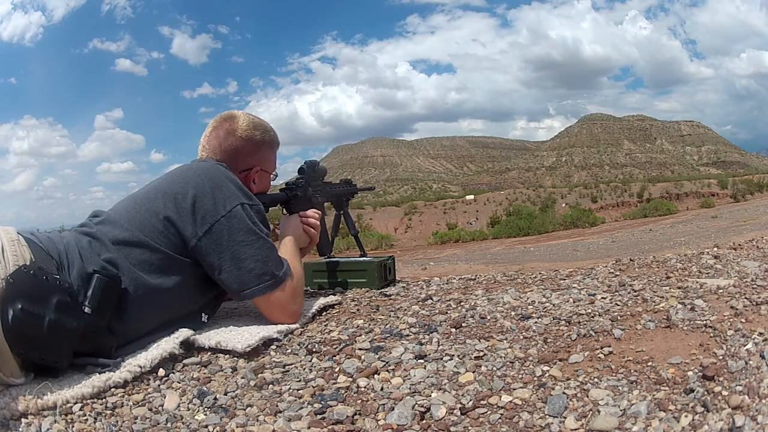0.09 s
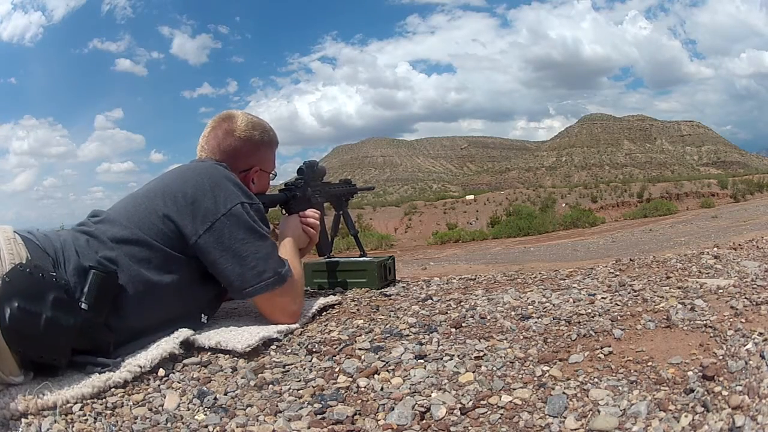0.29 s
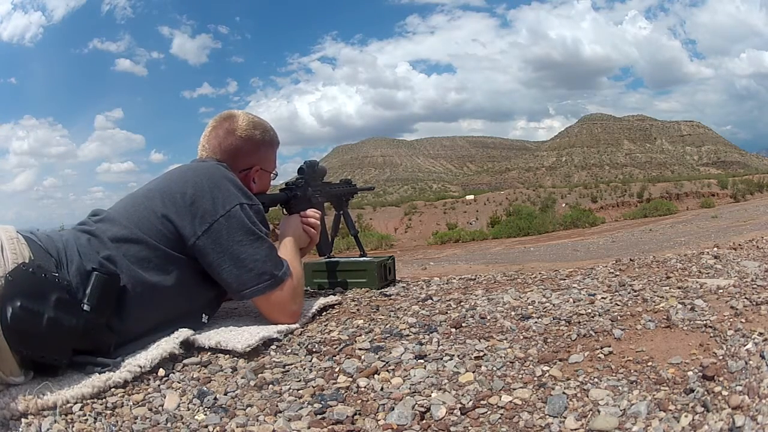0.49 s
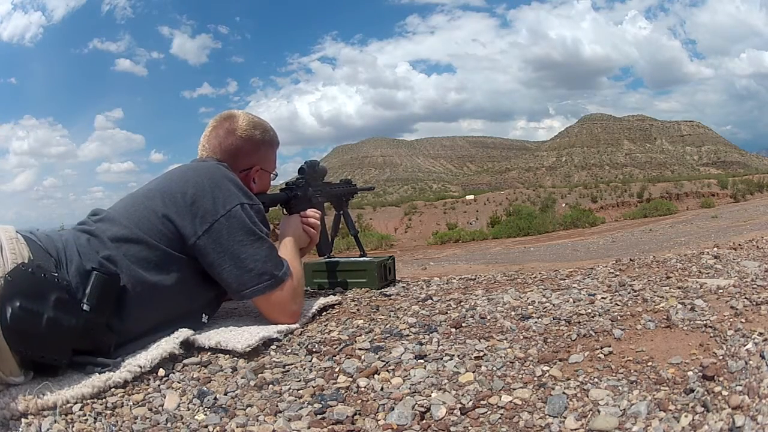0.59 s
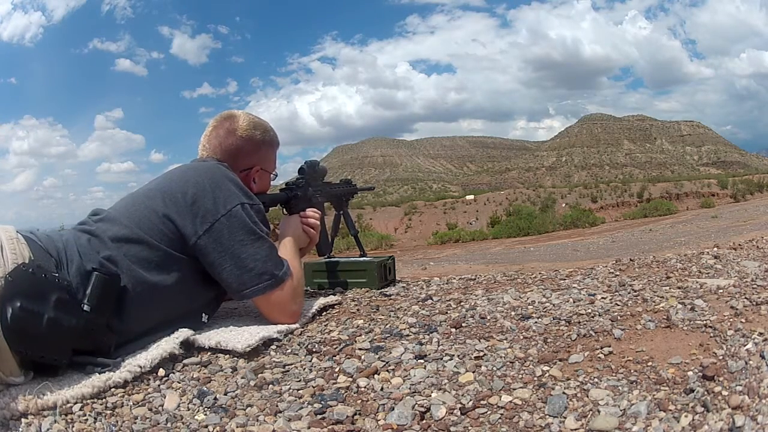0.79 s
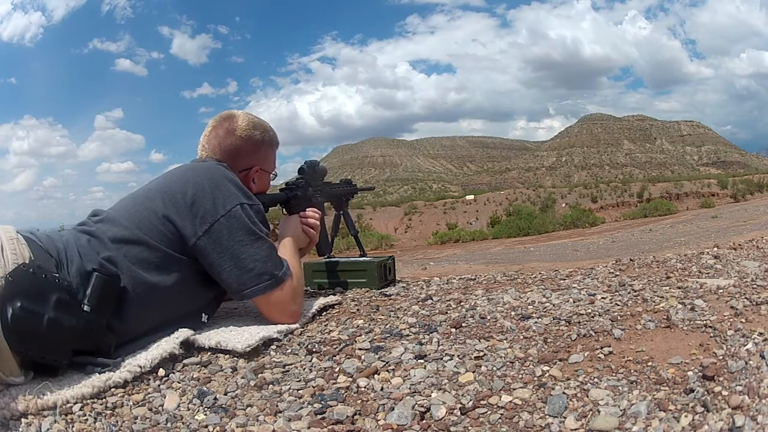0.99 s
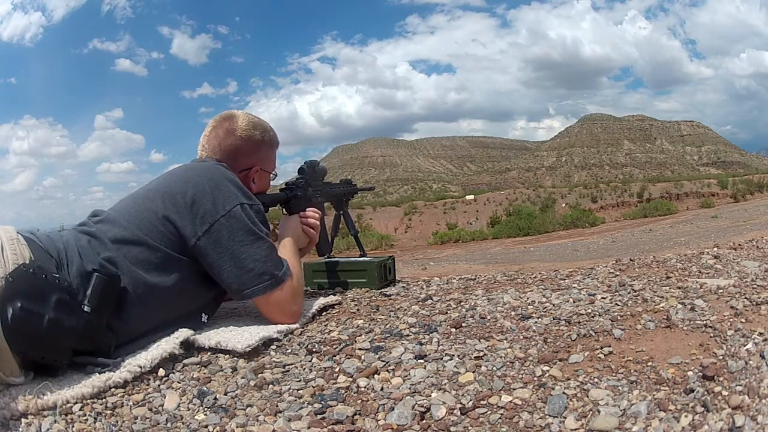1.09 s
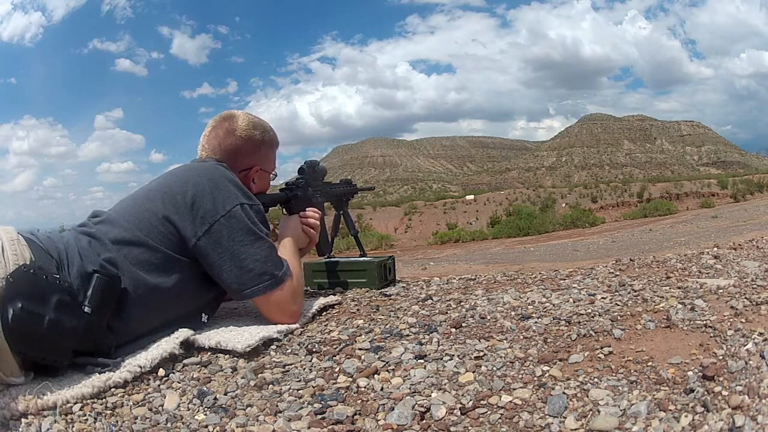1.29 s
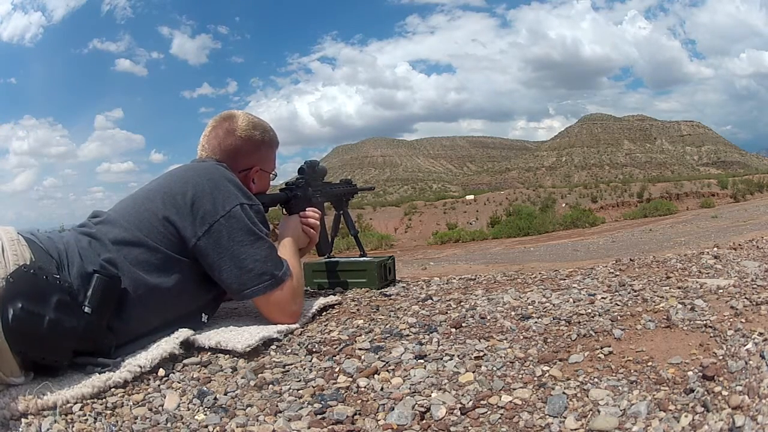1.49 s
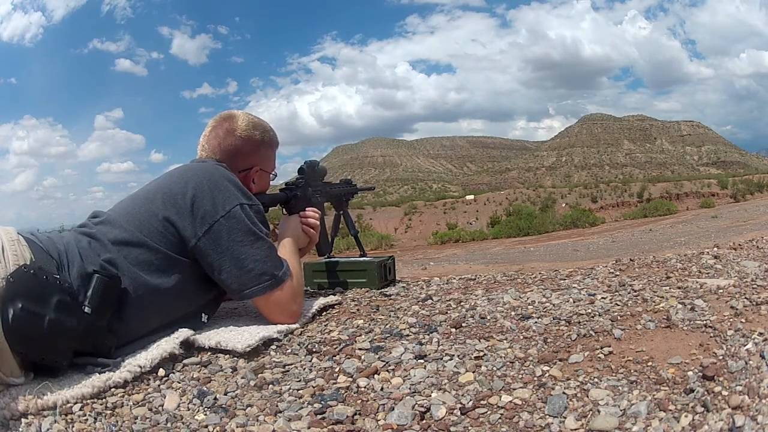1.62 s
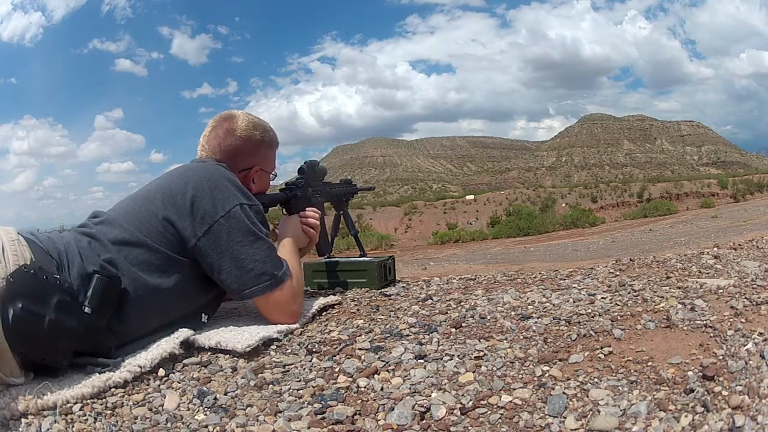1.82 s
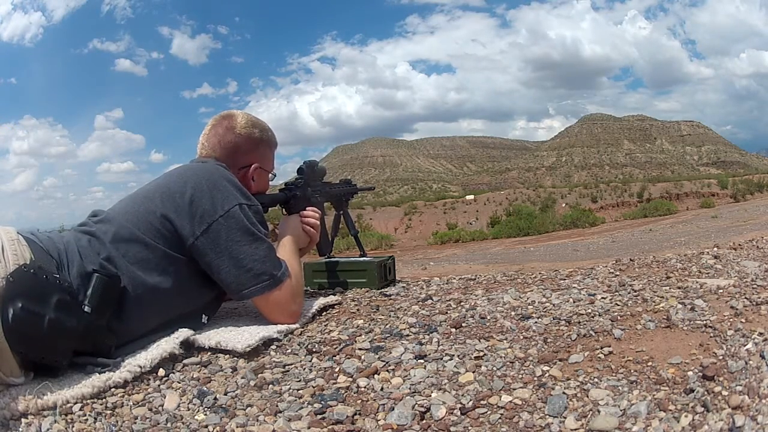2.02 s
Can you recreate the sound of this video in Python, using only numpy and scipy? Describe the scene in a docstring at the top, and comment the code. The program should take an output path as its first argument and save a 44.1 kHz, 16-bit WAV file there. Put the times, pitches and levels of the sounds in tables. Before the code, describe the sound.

Single close gunshot from a rifle outdoors, with a tearing, rolling echo off distant slopes

```python
"""Rifle shot in open hill country

One shot, fired prone on gravel close beside the microphone, in light wind. The muzzle blast overloads the
microphone, which rings as a sine of racing pitch under a jet of gas noise; the action clacks in noise clicks.
The bullet's crack hisses back from the brush and the blast rolls back from the near bank, both as thousands
of filtered reflections; sharp slaps and scattered echoes, swelling and fading, return from farther slopes."""
import sys
import numpy as np
from scipy import signal
from scipy.fft import rfft, irfft
from scipy.io import wavfile
from scipy.ndimage import uniform_filter1d

SR = 44100
rng = np.random.default_rng(int(sys.argv[2]) if len(sys.argv) > 2 else 0)


def master(y):
    """Save y as 16-bit WAV."""
    cut = np.clip(np.atleast_2d(y).T, -1, 1)
    pcm = np.round(cut * 32767)  # scale
    wavfile.write(sys.argv[1], SR, pcm.astype(np.int16))


N = 92610
TIME = np.arange(N) / SR
HZ = np.fft.rfftfreq(N, 1 / SR)
SHOT_S = 0.2323


def amp(db):
    """Decibels to gain."""
    return 10 ** (np.asarray(db) / 20)


def evened(x):
    """Scales to rms 1."""
    return x / np.sqrt(np.mean(x ** 2) + 1e-20)


def read_spectrum(points, hz):
    """Reads a spectrum, in dB, on a log-frequency axis."""
    point_hz, db = np.transpose(points)
    return np.interp(np.log(hz + 1), np.log(point_hz + 1), db)


def curve(rows, t, column=1):
    """Reads one column of a table over time, with straight lines between the rows."""
    rows = np.array(rows)
    return np.interp(t, rows[:, 0], rows[:, column])


def below(hz, edge):
    """Gain of a low-pass of 12 dB an octave; swapped arguments give a high-pass."""
    return 1 / np.sqrt(1 + ((hz + 1) / (edge + 1)) ** 4)


def burst(start, decay):
    """Envelope of a sudden attack (0.18 ms) and an exponential fall."""
    age = np.maximum(TIME - start, 0)
    return np.minimum(age / 0.00018, 1) * np.exp(-age / decay)


# How unlike the two close microphone ports hear a sound: (frequency [Hz], side minus mid [dB])
PORT_WIDTH = [(50, -5), (170, -10), (350, -13), (700, -17), (1400, -19), (2800, -14), (5500, -11),
              (14000, -11)]
# Tilt between the ports: (frequency [Hz], left minus right [dB])
PORT_BALANCE = [(60, 5.5), (200, 3.5), (400, 0.54), (1300, 0), (4400, 0), (15000, 0)]


def ports(pair, gain, width_db=0):
    """Colours two unrelated signals and blends them as the two close ports hear them, at rms 1."""
    mid, side = rfft(pair)
    side = side * amp(read_spectrum(PORT_WIDTH, HZ) + width_db)
    lean = amp(read_spectrum(PORT_BALANCE, HZ) / 2)
    left, right = (mid + side) * lean, (mid - side) / lean
    return evened(irfft(np.array([left, right]) * gain, N))


def noise(gain, width_db=0):
    """Stereo noise of a given colour."""
    return ports(rng.standard_normal((2, N)), gain, width_db)


# Direction, as far echoes come more from the right: (arrival time [s], lag of the left port [s])
LEFT_PORT_LAG = [(.5, 0.0000052), (1.3, 0.000024)]


def lagged(hz, s):
    """Phase factors of the two ports for a sound that arrives at time s."""
    turn = np.exp(-2j * np.pi * hz * curve(LEFT_PORT_LAG, s))
    return np.array([turn, np.ones_like(turn)])


# Light wind and microphone hiss: (frequency [Hz], level [dB])
OPEN_AIR = [(20, -9.5), (60, -1), (90, 3.5), (130, -7), (280, -4.5), (450, -14.5), (700, -17), (1400, -26),
            (3000, -30), (8000, -30.5), (15000, -29.5)]
AIR_DB, BREEZE_DB = -58.5, -59
BREEZE_S, BREEZE_HZ = 0.7, 85  # the rumble rises until this time, around this pitch
AIR_WIDTH_DB = 7  # above the bass, the open air differs more between the ports


def air():
    """Quiet open air as steady noise, with a breeze whose rumble sets in at the microphone."""
    rumble = noise((below(HZ, BREEZE_HZ) * below(BREEZE_HZ, HZ)) ** 2)
    hush = noise(amp(read_spectrum(OPEN_AIR, HZ)), AIR_WIDTH_DB * below(250, HZ))
    rise = np.minimum(TIME / BREEZE_S, 1) ** 2
    return amp(AIR_DB) * hush + amp(BREEZE_DB) * rise * rumble


ARRIVALS_PER_S, SIZE_SPREAD_DB = 6000, 3
FLUTTER_DB, FLUTTER_HZ = 0.7, 69.6  # depth (rms) and upper edge of the clumping


def scatter(spectrum):
    """Thousands of small reflections of uneven size and either sign, swelling in clumps."""
    sizes = amp(SIZE_SPREAD_DB * np.minimum(rng.exponential(1, (2, N)), 4))
    signs = rng.choice([-1, 1], (2, N))
    arrives = rng.random((2, N)) < ARRIVALS_PER_S / SR
    flutter_band = below(HZ, FLUTTER_HZ) * below(FLUTTER_HZ / 2, HZ)
    clumps = evened(irfft(rfft(rng.standard_normal(N)) * flutter_band, N))
    taps = sizes * signs * arrives * amp(FLUTTER_DB * clumps)
    return ports(taps, amp(read_spectrum(spectrum, HZ)))


AIR_DB_PER_S = 10.5  # loss at 10 kHz per second of travel, growing as frequency squared


def travel(x, path_gain):
    """Filters each moment of an echo by its path, its direction and the air it has crossed."""
    hz, t, z = signal.stft(x, SR, nperseg=1024, noverlap=768)
    hz = hz[:, None]
    air_gain = amp(-AIR_DB_PER_S * np.maximum(t - SHOT_S, 0) * (hz / 10000) ** 2)
    filtered = z * air_gain * path_gain(hz, t) * lagged(hz, t)
    return signal.istft(filtered, SR, nperseg=1024, noverlap=768)[1][:, :N]


# Blast rolling in from the slopes, before its path losses: (time [s], level [dB])
BLAST_ROLL = [(.24, -53), (.29, -24), (.325, -33.5), (.44, -29.5), (.475, -25.5), (.535, -22.5),
              (.578, -14.5), (.64, -23.5), (.70, -24.5), (.76, -33.5), (.84, -38.5), (.95, -40.5),
              (1.05, -48), (1.13, -46.5), (1.25, -52.5), (1.48, -52.5), (1.6, -51), (1.78, -54.5),
              (1.85, -45.5), (1.93, -39), (2.03, -39), (2.1, -41)]
# Colour of the returning blast: (frequency [Hz], level [dB])
BLAST_SPECTRUM = [(30, -20.5), (85, -12.5), (135, -6.5), (166, 6.5), (230, 0), (320, 1.5), (480, 0.5),
                  (720, -1.5), (980, -12), (1300, -10), (2000, -19), (4000, -36.5), (9000, -44.5),
                  (16000, -70.5)]
# Bass lost along each path: (time [s], high-pass edge [Hz])
PATH_BASS_CUT = [(.3, 230), (.45, 270), (.57, 111), (.71, 120), (.78, 232), (1.3, 270.1), (2.1, 270)]


def blast_echo():
    """The boom returns from the near bank and, much later, from the far hill, thinned in the bass."""
    def path_gain(hz, t):
        return below(curve(PATH_BASS_CUT, t), hz)
    return amp(curve(BLAST_ROLL, TIME)) * travel(scatter(BLAST_SPECTRUM), path_gain)


# Crack scattered by brush and rock, before path losses: (time [s], level [dB], treble limit [Hz])
CRACK_HISS = [(.24, -42, 9000), (.32, -40.5, 7100), (.41, -34, 7800), (.475, -23.5, 9000),
              (.53, -25.5, 6750), (.6, -26.5, 5130), (.69, -32, 4500), (.75, -40, 4000), (.87, -43, 3300),
              (1.0, -42, 3300), (1.07, -46, 2700), (1.2, -49.5, 2900), (1.245, -50.5, 5970),
              (1.335, -43.5, 6000), (1.375, -42.5, 4200), (1.41, -46.5, 3000), (1.485, -50.5, 2800),
              (1.53, -44, 2480), (1.665, -43, 2500), (1.74, -51.5, 2200), (1.84, -47.5, 2100),
              (1.94, -42, 1798), (2.0, -52.5, 1800), (2.1, -45, 1900)]
# Colour of the returning crack: (frequency [Hz], level [dB])
CRACK_SPECTRUM = [(30, -40), (250, -15), (600, -3.5), (1000, 0.5), (1350, 1), (2000, 2.5), (2900, 2.5),
                  (4200, -1), (5500, 0.5), (8200, -5), (11000, -14), (13500, -27.5), (16000, -41.5)]


def crack_echo():
    """The bullet's crack returns as a tearing hiss, mostly duller from farther away."""
    def path_gain(hz, t):
        return below(hz, curve(CRACK_HISS, t, column=2))
    return amp(curve(CRACK_HISS, TIME)) * travel(scatter(CRACK_SPECTRUM), path_gain)


# Sharp echoes from rock faces: (time [s], level [dB], decay [s], low edge [Hz], high edge [Hz])
ROCK_SLAPS = [(0.4702, -21, 0.0049, 300, 1800), (0.479, -25, 0.00054, 600, 4500),
              (1.2578, -42, .004, 2540, 5500), (1.3397, -31, 0.0052, 1400, 2800),
              (1.3427, -36.5, 0.0087, 4530, 6500), (1.3449, -30.5, 0.0056, 592, 3120),
              (1.371, -42.5, 0.011, 497, 3000), (1.666, -38.5, .005, 700, 2000)]
SLAP_TOP_HZ = 6300


def slaps():
    """Steep faces send the crack back in one piece, as short bursts of band-limited noise."""
    top = below(HZ, SLAP_TOP_HZ) ** 5
    out = np.zeros((2, N))
    for s, db, decay, low, high in ROCK_SLAPS:
        band = below(low, HZ) * below(HZ, high) * top
        out += amp(db) * burst(s, decay) * noise(band * lagged(HZ, s))
    return out


# Low thumps from the recoil and from single banks: (time [s], level [dB], pitch [Hz], decay [s])
LOW_THUMPS = [(0.2682, 2, 487, 0.0011), (.2705, -7.5, 310.6, .004), (0.2816, -9, 560, .003),
              (0.5811, -9.5, 230, 0.0036), (0.6904, -15, 428, 0.0028), (1.6839, -32.5, 440, 0.0057)]
THUMP_LOW_HZ = 170


def thumps():
    """Dull blows as briefly decaying sines, without deep bass, alike in both ports."""
    blows = np.zeros(N)
    for s, db, hz, decay in LOW_THUMPS:
        blows -= amp(db) * burst(s, decay) * np.sin(2 * np.pi * hz * (TIME - s))
    return irfft(rfft(blows) * below(THUMP_LOW_HZ, HZ), N)


# Hammer, bolt and spent case beside the microphone: (time [s], level [dB], decay [s], peak [Hz])
ACTION_CLICKS = [(0.2293, -18.5, 0.0027, 4170), (.268, -18, 0.0017, 2200), (.269, -29, .006, 7500),
                 (0.2772, -28, .003, 6450), (0.2866, -23, 0.0038, 6800), (0.4312, -18, 0.00096, 6800)]
CLICK_OCTAVES, CLICK_SKIRT_DB, CLICK_TOP_HZ = 0.3, -7, 10500  # peak width, noise around it, treble edge


def action():
    """Short, damped clicks of steel and brass: noise with one broad peak on a treble skirt."""
    skirt = amp(CLICK_SKIRT_DB) * below(1500, HZ)
    out = np.zeros((2, N))
    for s, db, decay, hz in ACTION_CLICKS:
        peak = np.exp(-0.5 * (np.log2((HZ + 1) / hz) / CLICK_OCTAVES) ** 2)
        out += amp(db) * burst(s, decay) * noise((peak + skirt) * below(HZ, CLICK_TOP_HZ) ** 2)
    return out


# Ringing of the overloaded microphone: (time [s], mean ring pitch [Hz], level [dB])
MIC_OVERLOAD = [(.2323, 1110, -5.5), (.2337, 1086, 5), (.2341, 6988, 8.5), (.2369, 4690, 8),
                (.2382, 1370, 6), (.2403, 600, 1.5), (.2415, 880, -14), (.246, 900, -41.5)]
# Jet of gas at the muzzle: (frequency [Hz], level [dB])
GAS_SPECTRUM = [(40, -8.5), (180, -9.5), (400, 6.5), (700, 3), (1300, -10), (2500, -5.5), (6000, -2),
                (11000, -11.5), (16000, -24.5)]
# Blast scattered by the ground close by: (frequency [Hz], level [dB])
GROUND_SPECTRUM = [(30, -15), (70, 0), (170, -4.5), (300, -0.5), (700, -4), (1300, -8), (3000, -15.5),
                   (8000, -25.5), (12000, -35.5), (16000, -52)]
RING_JITTER, PORT_JITTER = 0.27, 0.05  # rms wander of the pitch, as a fraction: shared, and per port
RING_LAG_S = 0.000018  # the left port rings a little later
GAS_DB = -5.5  # gas before the shared ring level is applied
PUSH_S, PUSH_DB = 0.0019, -5  # the pressure wave itself
GROUND_DB, GROUND_T60_S = -15.5, 0.19


def muzzle():
    """A pressure wave and a jet of gas set the microphone ringing; the ground scatters the blast."""
    fired = TIME > SHOT_S
    waver = evened(uniform_filter1d(rng.standard_normal((3, N)), size=10, axis=1))
    jitter = RING_JITTER * waver[0] + PORT_JITTER * waver[1:]
    ring_hz = curve(MIC_OVERLOAD, TIME) * (1 + jitter) * fired
    left, right = np.sin(2 * np.pi * np.cumsum(ring_hz, axis=1) / SR)
    ring = np.array([np.interp(TIME - RING_LAG_S, TIME, left), right])
    level = amp(curve(MIC_OVERLOAD, TIME, column=2)) * fired * (TIME < MIC_OVERLOAD[-1][0])

    # sudden overpressure that swings below zero, then recovers
    u = np.maximum(TIME - SHOT_S, 0) / PUSH_S
    push = amp(PUSH_DB) * (1 - u) * np.exp(-u) * (u > 0)

    ground_fall = burst(SHOT_S, GROUND_T60_S / np.log(1000))
    ground = amp(GROUND_DB) * noise(amp(read_spectrum(GROUND_SPECTRUM, HZ))) * ground_fall
    gas = amp(GAS_DB) * noise(amp(read_spectrum(GAS_SPECTRUM, HZ)), width_db=6)
    return level * (ring + gas) + push + ground


def scene():
    """The echoes from the hills, the shot beside the microphone, and the open air."""
    echoes = (blast_echo() + crack_echo()) * (TIME > SHOT_S) + slaps()
    return muzzle() + thumps() + action() + echoes + air()


CEILING, EDGE_HZ = 0.81, 15700  # level at which the input saturates; band limit


def record(dry):
    """The microphone input clips hard, with a tight knee at its ceiling; then the band limit."""
    clipped = dry / (1 + np.abs(dry / CEILING) ** 6) ** (1 / 6)
    low_pass = signal.firwin(201, EDGE_HZ, window=("kaiser", 7), fs=SR)
    return signal.oaconvolve(clipped, low_pass[None], "same")


dry = scene()
out = record(dry)
master(out)
```